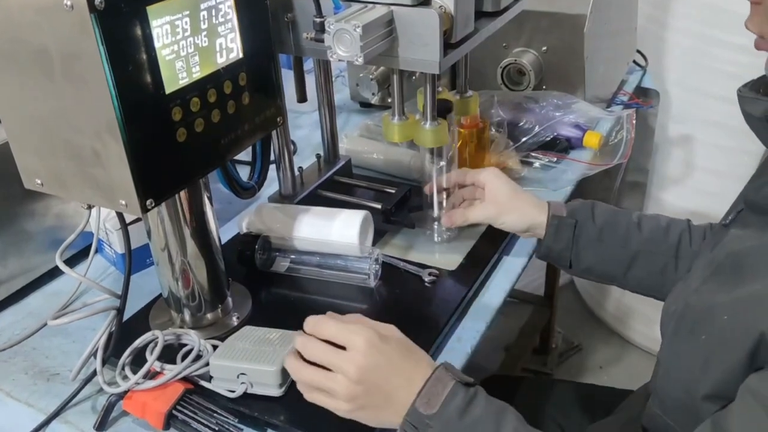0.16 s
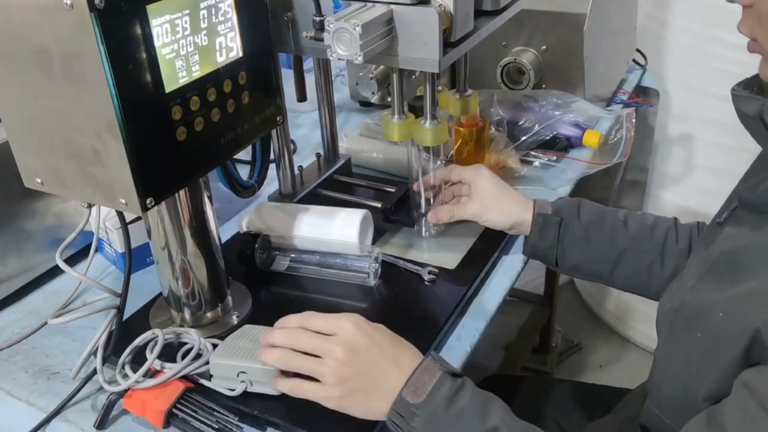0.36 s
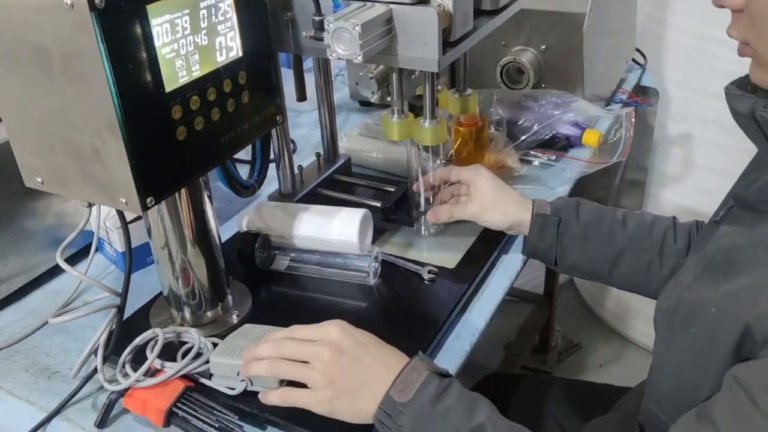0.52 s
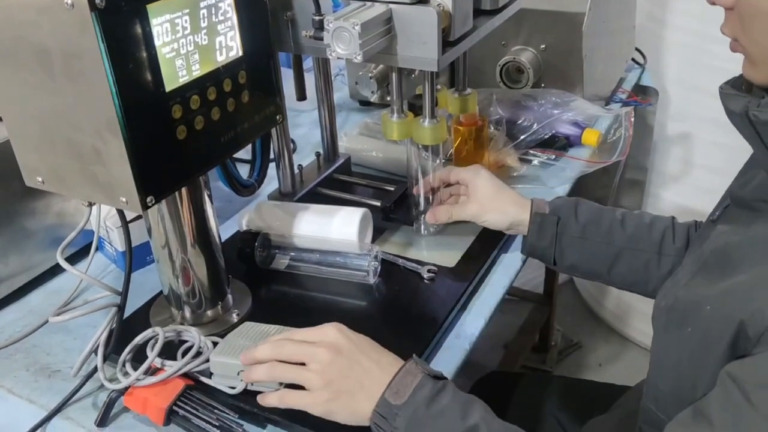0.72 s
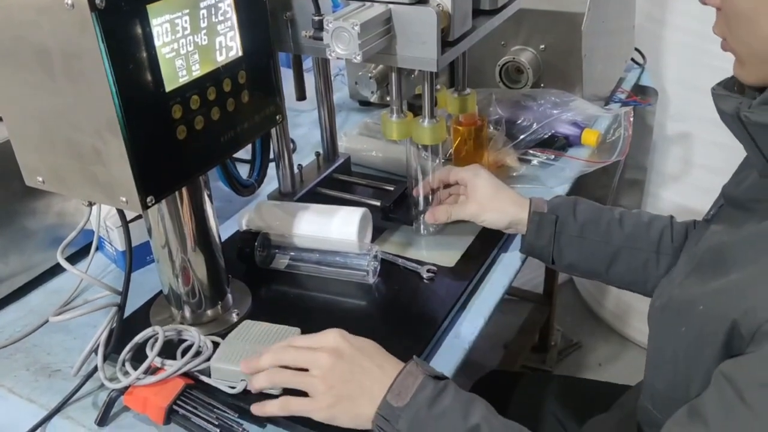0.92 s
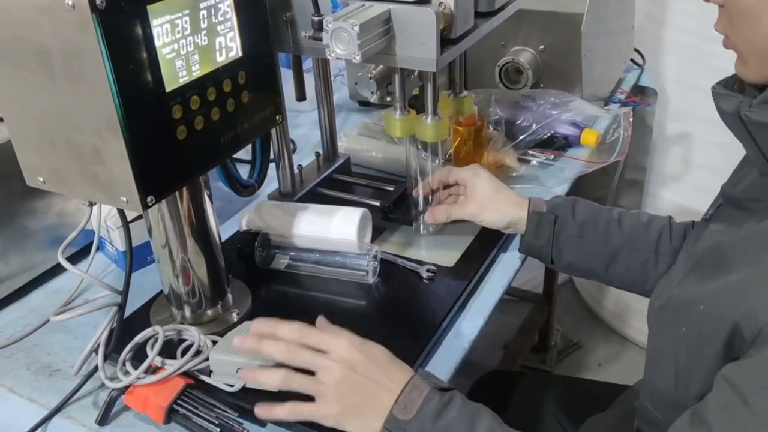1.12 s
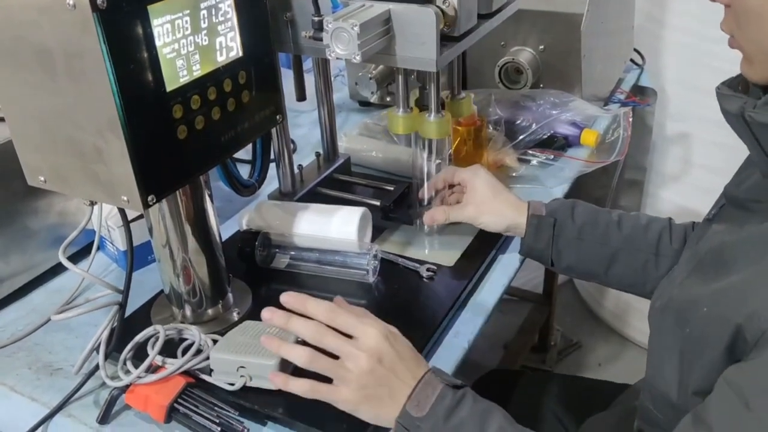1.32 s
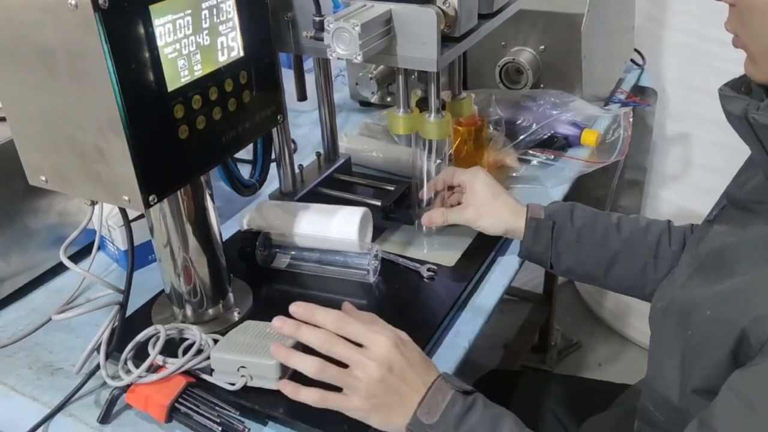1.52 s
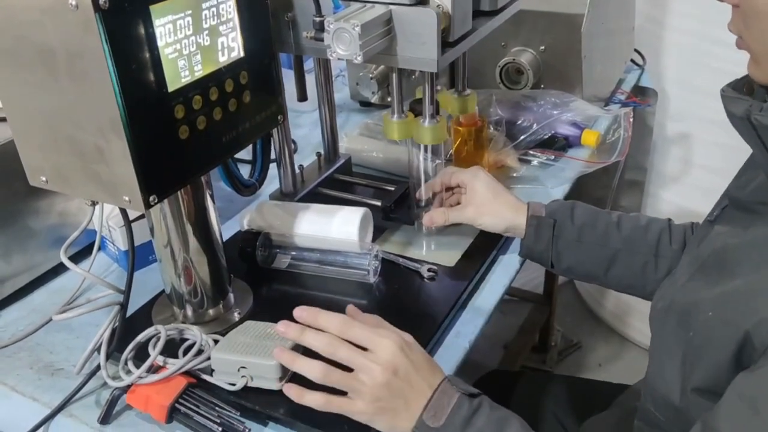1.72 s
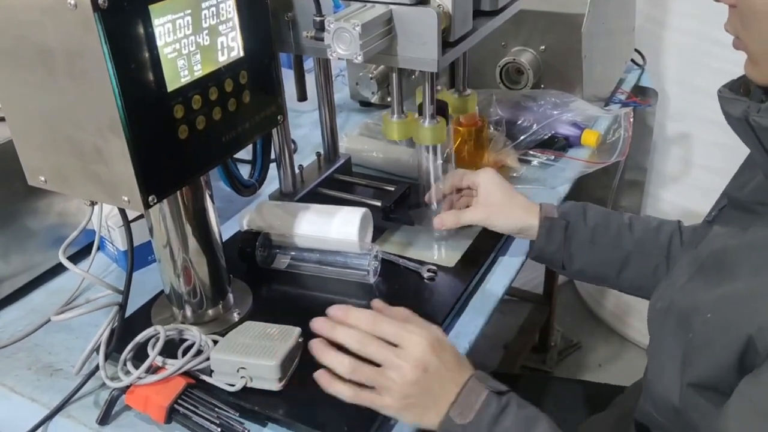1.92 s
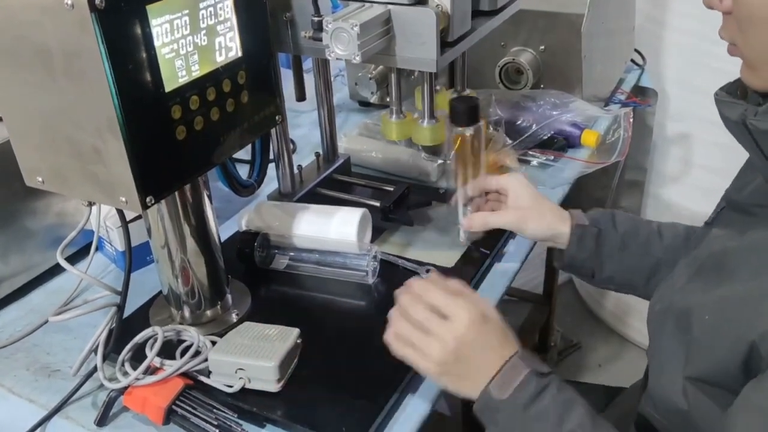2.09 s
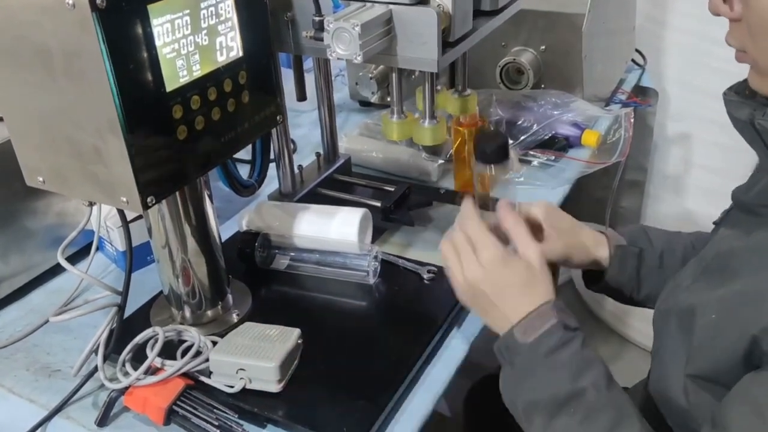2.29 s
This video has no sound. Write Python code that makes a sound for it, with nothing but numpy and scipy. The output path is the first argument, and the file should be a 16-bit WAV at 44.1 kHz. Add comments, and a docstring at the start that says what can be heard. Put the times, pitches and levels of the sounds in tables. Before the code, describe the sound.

An air-driven bench capper works one cycle over low rumble, throbbing motor hum and thin leaking hiss. Two dull distant booms roll at 0.1 and 0.26 seconds. A pedal switch snaps at 0.95; air spurts at 1.09, and the head clacks hard at 1.16. A brighter puff bursts at 1.52, with a softer hollow thunk at 1.61, tiny ticks from 1.8, and workshop echoes.

```python
"""Bench capper in a workshop

One cycle of an air-driven bench capper, over rumble, motor hum and the thin hiss of leaking air.
First two dull booms roll through the building: filtered noise bursts and ringing modes.
A pedal switch clicks, a valve puffs out air and the head clacks down on the cap; a second puff lifts it
to a softer stop. Air is shaped noise; the blows are short noise rattles with damped ringing notes.
Faint ticks of the bottle coming free end the cycle, and echoes surround the machine and pedal."""
import sys
import numpy as np
from scipy import signal
from scipy.fft import rfft, irfft
from scipy.io import wavfile
from scipy.ndimage import uniform_filter1d

SR = 44100
rng = np.random.default_rng(int(sys.argv[2]) if len(sys.argv) > 2 else 0)


def materialize(psi):
    """Save the field psi as 16-bit PCM at rate SR to the path in sys.argv[1].

    A 1-D psi becomes a single channel; in a 2-D psi each row is a channel.
    """
    bounded = np.clip(np.atleast_2d(psi).T, -1, 1)
    quanta = np.round(bounded * 32767).astype(np.int16)
    wavfile.write(sys.argv[1], SR, quanta)


N = 103635  # samples, 2.35 s


def amp(db):
    """Turns decibels into a gain."""
    return 10 ** (np.asarray(db) / 20)


def unit(x):
    """Scales a signal to rms 1."""
    return x / np.sqrt(np.mean(x ** 2) + 1e-20)


def read(points, hz):
    """Reads a table of points in straight lines along log frequency."""
    f, value = np.transpose(points)
    return np.interp(np.log(hz + 1), np.log(f + 1), value)


def clock():
    """Gives the time of every sample in seconds."""
    return np.arange(N) / SR


def noise(points):
    """Steady noise of rms 1 with the given spectrum."""
    gain = amp(read(points, np.fft.rfftfreq(N, 1 / SR)))
    return unit(irfft(rfft(rng.standard_normal(N)) * gain, N))


def drift(rate_hz):
    """Smooth random wandering of rms 1, with little movement faster than rate_hz."""
    hz = np.fft.rfftfreq(N, 1 / SR)
    keep_slow = np.exp(-(hz / rate_hz) ** 2) * (hz > 0)
    return unit(irfft(rfft(rng.standard_normal(N)) * keep_slow, N))


TILT_PIVOT_HZ = 1070  # the treble tilt starts here


def colour(x, points, tilt_db=0):
    """Causal filter of unit energy with the given spectrum; tilt_db per octave changes the treble."""
    size = 4096
    hz = np.fft.rfftfreq(size, 1 / SR)
    db = read(points, hz) + tilt_db * np.log2(np.maximum(hz / TILT_PIVOT_HZ, 1))
    log_gain = np.log(amp(db - db.max()) + 1e-5)
    # The Hilbert transform supplies the phase that puts the energy as early as possible.
    mirrored = np.r_[log_gain, log_gain[-2:0:-1]]
    taps = np.fft.ifft(np.exp(np.conj(signal.hilbert(mirrored)))).real
    return signal.fftconvolve(x, taps / np.linalg.norm(taps))[:N]


def envelope(start, rise, t60, hold=0):
    """Rises, holds, then dies away by 60 dB in t60 seconds."""
    t = clock() - start
    fall = np.exp(-np.log(1000) * np.maximum(t - rise - hold, 0) / t60)
    return np.clip(t / rise, 0, 1) * fall


def burst(start, rise, t60, hold=0):
    """A burst of white noise."""
    return rng.standard_normal(N) * envelope(start, rise, t60, hold)


def ring(start, modes):
    """Notes struck at one moment, each dying away at its own pace."""
    t = np.maximum(clock() - start, 0)
    return sum(amp(db) * np.exp(-np.log(1000) * t / t60) * np.sin(2 * np.pi * hz * t)
               for hz, db, t60 in modes)


# Colour of the workshop rumble. Each row: frequency in Hz, relative level in dB.
RUMBLE_COLOUR = [(30, -21), (50, 6), (75, -2.5), (120, 1.5), (220, -2.5), (340, -3.5), (450, -16.5),
                 (680, -12), (1000, -17), (1500, -20), (2200, -23), (4000, -67)]
RUMBLE_END_DB, RUMBLE_FADE_DB_PER_S = -41.5, 1


def rumble():
    """Low shaped noise that eases steadily to its final level."""
    t = clock()
    return amp(RUMBLE_END_DB + RUMBLE_FADE_DB_PER_S * (t[-1] - t)) * noise(RUMBLE_COLOUR)


# Colour of the leaking air. Each row: frequency in Hz, relative level in dB.
LEAK_COLOUR = [(880, -59), (1500, 0), (1670, -10.5), (2030, -8), (2410, 4.5), (2750, -6.5), (3030, 2),
               (3520, -11.5), (3910, -10.5), (4220, -20.5), (4470, -5), (4640, -4.5), (5200, -21.5),
               (7250, -11), (8050, 1.5), (9370, -17), (10900, -21.5), (12700, -22), (14500, -36)]
LEAK_DB, LEAK_FLUTTER_DB, FLUTTER_HZ = -46, 1.5, 40


def leak():
    """Thin hiss of leaking air: shaped noise with a fluttering level."""
    return amp(LEAK_DB + LEAK_FLUTTER_DB * drift(FLUTTER_HZ)) * noise(LEAK_COLOUR)


# Notes of the motor hum. Each row: frequency in Hz, rms level in dB.
HUM_NOTES = [(100, -49), (162, -49), (198, -50.5)]
HUM_WAVER, WAVER_HZ = 0.27, 3.1
DRONE_HZ, DRONE_DB = 45.7, -44
THROB_HZ, THROB_DIP_S, THROB_DEPTH = 3.63, 1.61, 0.65  # one of the regular dips falls at THROB_DIP_S


def motor():
    """A deep drone that throbs regularly, under hum notes that waver in level and pitch."""
    t = clock()
    throb = 1 - THROB_DEPTH * np.cos(2 * np.pi * THROB_HZ * (t - THROB_DIP_S))
    out = amp(DRONE_DB) * unit(throb * np.sin(2 * np.pi * DRONE_HZ * t))
    for hz, db in HUM_NOTES:
        level = 1 + HUM_WAVER * drift(WAVER_HZ)
        phase = HUM_WAVER * hz / DRONE_HZ * drift(WAVER_HZ)  # higher notes wander more
        out += amp(db) * unit(level * np.sin(2 * np.pi * hz * t + phase))
    return out


# Swells of a higher hum note. Each row: time of its height in seconds, width in seconds,
# peak level in dB.
HUM_SWELLS = [(.17, 0.055, -34.5), (1.94, 0.15, -43.5)]
SWELL_HZ = 335


def swells():
    """A higher note of the hum swells up twice and sinks away."""
    t = clock()
    level = sum(amp(db) * np.exp(-((t - s) / width) ** 2) for s, width, db in HUM_SWELLS)
    return level * np.sin(2 * np.pi * SWELL_HZ * t)


# Distant booms. Each row: start in seconds, level of the roll in dB before the bass cut,
# level of the building's ring in dB before the bass cut, bass cut in Hz.
BOOM_EVENTS = [(.1, -33.5, -34, 136), (.258, -25.5, -27.5, 44)]
# Colour of the roll. Each row: frequency in Hz, relative level in dB.
BOOM_COLOUR = [(29, -32), (50, -30), (102, 6), (135, -9.5), (256, -4.5), (400, -17), (430, -23),
               (529, -16.5), (582, -51), (900, -33), (1170, -89), (1980, -120)]
# Notes of the ringing building. Each row: frequency in Hz, relative level in dB, 60 dB decay in seconds.
BUILDING_MODES = [(95.7, -9, 2.4), (113.7, -9, 3.1), (166.7, 9, 0.39), (206.5, -4, 0.94), (264, -8, 2.8),
                  (296, -19, 0.39), (326.7, -8.5, 0.73), (385.5, -14.5, 1.2)]
BOOM_RISE_S, BOOM_T60, BOOM_TAIL_DB, BOOM_TAIL_T60 = 0.034, 0.12, 0.5, 1.97


def booms():
    """Far, dull blows that roll on and ring through the building; the first has little weight."""
    out = np.zeros(N)
    for s, db, ring_db, cut_hz in BOOM_EVENTS:
        thud = burst(s, BOOM_RISE_S, BOOM_T60)
        tail = amp(BOOM_TAIL_DB) * burst(s, BOOM_RISE_S, BOOM_TAIL_T60)
        roll = amp(db) * colour(thud + tail, BOOM_COLOUR)
        soft_start = np.clip((clock() - s) / BOOM_RISE_S, 0, 1)
        building = amp(ring_db) * soft_start * ring(s, BUILDING_MODES)
        bass_cut = signal.butter(4, cut_hz, "highpass", fs=SR, output="sos")
        out += signal.sosfilt(bass_cut, roll + building)
    return out


# Pedal switch contacts. Each row: start in seconds, level of the snap in dB,
# level of the housing's ring in dB.
CONTACTS = [(0.9321, -33.5, -25.5), (0.959, -16, -23), (0.9607, -19.5, -26.5), (0.9649, -28.5, -28)]
# Notes of the pedal housing. Each row: frequency in Hz, relative level in dB, 60 dB decay in seconds.
HOUSING_MODES = [(1006, 2, 0.06), (1270, -23, 0.12), (2320, -13.5, 0.037), (2610, -14, 0.095),
                 (3280, -11, 0.024)]
# Knock on the bench. Each row: frequency in Hz, level in dB, 60 dB decay in seconds.
KNOCK_MODES = [(716, -30.5, 0.11), (789, -21.5, 0.046)]
# The pedal's return spring. Each row: frequency in Hz, level in dB, 60 dB decay in seconds.
SPRING_MODES = [(930, -27, 0.25), (1020, -41, 0.13), (2650, -37, 0.18), (3700, -43, 1), (11350, -53, 0.75)]
# Bright colour of the snaps, also used for the ticks. Each row: frequency in Hz, relative level in dB.
SNAP_COLOUR = [(880, -63), (1500, -12), (2030, -10), (2630, -10.5), (3060, -9), (3360, -33), (3660, -24),
               (3990, -4), (4260, -20), (4640, -6), (5060, -21), (5450, -6), (6000, -21), (6720, -1.5),
               (7390, -9), (8360, 5), (9370, -11), (10200, -4), (13300, -17), (13800, -11), (14500, -35)]
SNAP_RISE_S, SNAP_T60 = 0.00027, 0.019
SPRING_RATTLE, RATTLE_HZ = 1, 60


def switch():
    """The pedal touches, snaps over, knocks the bench on the third contact and bounces; its spring rattles."""
    snaps = sum(amp(db) * burst(s, SNAP_RISE_S, SNAP_T60) for s, db, _ in CONTACTS)
    housing = sum(amp(db) * ring(s, HOUSING_MODES) for s, _, db in CONTACTS)
    bottom = CONTACTS[2][0]
    spring = sum(ring(bottom, [mode]) * unit(1 + SPRING_RATTLE * drift(RATTLE_HZ))
                 for mode in SPRING_MODES)
    return colour(snaps, SNAP_COLOUR) + housing + ring(bottom, KNOCK_MODES) + spring


# Ticks of the bottle as the head lets go. Each row: start in seconds, level in dB.
BOTTLE_TICKS = [(1.8001, -35), (1.8255, -46), (1.847, -46)]
TICK_T60 = 0.015


def ticks():
    """Small, bright ticks of the bottle coming free: very short noise bursts."""
    bursts = sum(amp(db) * burst(s, SNAP_RISE_S, TICK_T60) for s, db in BOTTLE_TICKS)
    return colour(bursts, SNAP_COLOUR)


# Valve and piston jolts. Each row: start in seconds, level in dB, 60 dB decay in seconds,
# treble tilt in dB per octave, level of the frame's ring in dB.
JOLT_EVENTS = [(1.089, -19.5, 0.038, -1.5, -36.5), (1.166, -30, 0.26, -13, -28.5),
               (1.505, -31.5, 0.023, -14, -29), (1.52, -20, 0.018, 2, -43)]
# Colour of a jolt before its tilt. Each row: frequency in Hz, relative level in dB.
JOLT_COLOUR = [(40, -32.5), (90, -9), (200, -1), (300, -5), (500, -12.5), (1000, -26.5), (3000, -95)]
# Notes of the frame and bench. Each row: frequency in Hz, relative level in dB, 60 dB decay in seconds.
FRAME_NOTES = [(130.9, -7.5, 0.54), (199, 2.5, 0.14)]
JOLT_ATTACK_S = 0.0016


def jolts():
    """Valve and piston shake the frame and bench: dull noise bursts over two low ringing notes."""
    out = np.zeros(N)
    for s, db, t60, tilt_db, ring_db in JOLT_EVENTS:
        out += amp(db) * colour(burst(s, JOLT_ATTACK_S, t60), JOLT_COLOUR, tilt_db)
        out += amp(ring_db) * ring(s, FRAME_NOTES)
    return out


# Piston hits on the padded stop. Each row: start in seconds, level in dB.
STOP_CHATTER = [(1.1704, -19), (1.6095, -23), (1.6195, -18), (1.6305, -23)]
# Notes of the end stop. Each row: frequency in Hz, relative level in dB, 60 dB decay in seconds.
STOP_NOTES = [(640, -14.5, 0.048), (808, -5, 0.033), (882, -0.5, 0.035), (969, -9, 0.056),
              (2071, -8.5, 0.069)]
STOP_PAD_S = 0.0021  # the padding softens the start of each hit


def end_stop():
    """Padded, hollow thunks as the piston meets its stop, chattering after the up stroke."""
    return sum(amp(db) * np.clip((clock() - s) / STOP_PAD_S, 0, 1) * ring(s, STOP_NOTES)
               for s, db in STOP_CHATTER)


SPUTTER_DB, SPUTTER_HZ = 0.6, 220


def puff(start, db, rise, hold, t60, port):
    """Air escapes unevenly through a port; the hiss falls with the pressure."""
    sputter = unit(amp(SPUTTER_DB * drift(SPUTTER_HZ)))
    return amp(db) * colour(burst(start, rise, t60, hold) * sputter, port)


PATCH_DB, PATCH_HZ, PATCH_S = 3, 450, 0.014  # strength before levelling, width and length of a patch


def flutter(x):
    """Patches of the spectrum rise and fall at random."""
    hz, at, z = signal.stft(x, SR, nperseg=256)
    patches = rng.standard_normal(z.shape)
    patches = uniform_filter1d(patches, max(round(PATCH_HZ / hz[1]), 1), axis=0)
    patches = uniform_filter1d(patches, max(round(PATCH_S / at[1]), 1), axis=1)
    gain = unit(amp(PATCH_DB * unit(patches)))
    return signal.istft(z * gain, SR, nperseg=256)[1][:N]


# Spurts as the valve's spool shifts. Each row: start in seconds, level in dB, rise in seconds,
# hold in seconds, 60 dB decay in seconds.
VALVE_SPURTS = [(1.0827, -19, 0.0034, .012, .045), (1.148, -29, 0.0015, .004, .012),
                (1.505, -34.5, 0.0043, 0.0032, 0.014)]
# Air vented by the down stroke, then the up stroke. Each row: start in seconds, level in dB,
# rise in seconds, hold in seconds, 60 dB decay in seconds.
STROKE_PUFFS = [(1.094, -20, 0.0047, 0.0096, 0.35), (1.521, -19, 0.005, 0.023, 0.34)]
# Colours of the valve and the two exhaust ports. Each row: frequency in Hz, relative level in dB.
VALVE_COLOUR = [(880, -32), (1500, -7), (1920, -22), (2580, -24), (3150, 3.5), (3560, -5.5), (4000, -1),
                (4340, -17.5), (5250, -2.5), (6590, -39), (7320, -6), (8280, 5), (9280, -19), (10300, 0.5),
                (11200, -27), (11850, 3), (13200, -11), (14500, -10)]
DOWN_PORT_COLOUR = [(410, -44), (700, -3), (998, -1), (1110, -7), (1770, -10), (1960, -29), (2400, -9),
                    (3170, -10), (3550, -28), (3830, -1), (3980, -34), (4130, -13.5), (6360, -4.5),
                    (7310, -10), (8300, 2.5), (10600, -5.5), (12100, 0), (13300, -12), (14500, -9)]
UP_PORT_COLOUR = [(400, -23), (700, -9.5), (1350, -12), (1750, -4.5), (2000, -8), (2850, 0.5), (3400, -3),
                  (4150, -2), (4380, -24), (4720, -14), (4950, -3), (5400, -10.5), (5800, -4), (6900, -10),
                  (7500, 1), (8200, 6), (9000, 0), (10100, -3), (10800, -3.5), (11900, 0), (13000, -5.5),
                  (14500, -7.5)]
# The down stroke's air chokes as the head nears the cap.
CHOKE_S, CHOKE_DB, CHOKE_FALL_S = 1.152, -12, 0.0018


def exhaust():
    """The valve spurts as it shifts, then each stroke vents, sputtering, through its own port."""
    spurts = sum(puff(*row, VALVE_COLOUR) for row in VALVE_SPURTS)
    down = puff(*STROKE_PUFFS[0], DOWN_PORT_COLOUR)
    up = puff(*STROKE_PUFFS[1], UP_PORT_COLOUR)
    choke = amp(CHOKE_DB * np.clip((clock() - CHOKE_S) / CHOKE_FALL_S, 0, 1))
    return spurts + flutter(down * choke + up)


def resonate(x, hz, width):
    """Three equal resonances in a row follow the curve hz, making one steep peak."""
    turn = np.exp(2j * np.pi * np.cumsum(hz) / SR)
    r = np.exp(-np.pi * width / SR)
    # Shift the moving pitch down to zero, smooth there, and shift back.
    smooth = signal.lfilter([(1 - r) ** 3], np.poly([r, r, r]), x / turn)
    return (turn * smooth).real


# Narrow bands of the up port. Each row: starting frequency in Hz, width of each of the three
# resonances in Hz, rms level in dB before the envelope.
SPIT_BANDS = [(1956, 41, -38.5), (2300, 140, -38), (2940, 370, -30.5), (3490, 730, -28.5),
              (5380, 500, -25.5)]
SPIT_HOLD_S, SPIT_T60 = 0.008, 0.12
SPIT_SAG_PER_S = 1.34  # rate at which the pitch sinks, as a share of itself


def spit():
    """The first rush of the up stroke sounds its port's resonances, which sink as the pressure empties."""
    start, _, rise, _, _ = STROKE_PUFFS[1]
    sag = np.exp(-SPIT_SAG_PER_S * np.clip(clock() - start, 0, SPIT_T60))
    bands = sum(amp(db) * unit(resonate(rng.standard_normal(N), hz * sag, width))
                for hz, width, db in SPIT_BANDS)
    return bands * envelope(start, rise, SPIT_T60, SPIT_HOLD_S)


# Blows of the head. Each row: start in seconds, level of the rattle in dB, rise in seconds,
# 60 dB decay in seconds, treble tilt in dB per octave, level of the ring in dB.
HEAD_BLOWS = [(1.089, -21, 0.0025, 0.028, -12.5, -45), (1.162, -16, 0.0019, 0.038, -1, -10.5),
              (1.172, -25.5, .0005, 0.27, 0.5, -27), (1.1836, -23.5, 0.00056, 0.02, 0, -20.5),
              (1.609, -29, 0.0026, 0.33, -2.5, -32)]
# Colour of the rattle before its tilt. Each row: frequency in Hz, relative level in dB.
HEAD_COLOUR = [(180, -29), (300, -5), (395, -6.5), (794, -1), (1250, -10.5), (1570, -5), (2390, -0.5),
               (2680, -4), (2960, 0), (3370, -8.5), (4000, -7), (4400, -11), (4730, -6.5), (5390, -11),
               (6650, -39), (7700, 1), (8220, -1.5), (9980, -5), (11000, -12), (11900, 1), (13000, -14),
               (14500, -43)]
# Notes of the ringing head. Each row: frequency in Hz, relative level in dB, 60 dB decay in seconds.
HEAD_NOTES = [(870, -16.5, .05), (1546, -12.5, 0.031), (1638, -9, 0.027), (1854, -10, 0.022),
              (2254, -10.5, .02), (3040, -14, 0.037)]


def head():
    """The head breaks loose, strikes the cap, settles and returns to its stop: a rattle and a ring each."""
    out = np.zeros(N)
    for s, db, rise, t60, tilt_db, ring_db in HEAD_BLOWS:
        out += amp(db) * colour(burst(s, rise, t60), HEAD_COLOUR, tilt_db)
        out += amp(ring_db) * ring(s, HEAD_NOTES)
    return out


# Echoes off the bench top and panels near the machine. Each row: delay in seconds, level in dB
# relative to the direct sound.
PANEL_ECHOES = [(.0017, -12.5), (.0031, -17), (.0054, -14.5), (.0097, -40), (0.0225, -20)]


def nearby(x):
    """First reflections comb the sound; the gain allows for their added energy."""
    echoes = sum(amp(db) * np.r_[np.zeros(round(s * SR)), x][:N] for s, db in PANEL_ECHOES)
    return (x + echoes) / np.sqrt(1 + sum(amp(db) ** 2 for _, db in PANEL_ECHOES))


# How long the workshop echoes. Each row: frequency in Hz, 60 dB decay in seconds.
ROOM_DECAY = [(100, 2.5), (500, 2), (2500, 1.27), (5000, 1.0), (8000, 0.8), (12000, .5)]
# Colour of the workshop's echo. Each row: frequency in Hz, relative level in dB.
ROOM_TONE = [(100, 6.5), (700, -2), (2500, 4), (5000, 5), (8000, -0.5), (12000, -1)]
ROOM_DELAY_S, ROOM_BUILD_S = 0.0035, 0.01


def room(x):
    """Sparse random reflections whose treble dies first."""
    taps = rng.choice([-1., 1.], N) * (rng.random(N) < 4000 / SR)  # about 4000 reflections per second
    taps *= np.clip((clock() - ROOM_DELAY_S) / ROOM_BUILD_S, 0, 1)
    hz, at, z = signal.stft(taps, SR, nperseg=256)
    decay = np.exp(-np.log(1000) * at / read(ROOM_DECAY, hz)[:, None])
    z = z * decay * amp(read(ROOM_TONE, hz))[:, None]
    tail = signal.istft(z, SR, nperseg=256)[1][:N]
    return signal.fftconvolve(x, tail / np.linalg.norm(tail))[:N]


MACHINE_WET_DB, SWITCH_WET_DB, SPIT_WET_DB = -7, -8, -14.5  # how strongly each feeds the echo


def scene():
    """Machine and switch in the room, over the background; the narrow jet of the spit stirs the room least."""
    background = rumble() + leak() + motor() + swells()
    pedal = switch()
    machine = nearby(exhaust()) + jolts() + head() + end_stop() + ticks()
    jet = spit()
    echo = room(amp(MACHINE_WET_DB) * machine + amp(SWITCH_WET_DB) * pedal + amp(SPIT_WET_DB) * jet)
    return (background + booms() + pedal + machine + jet + echo)[None]


MIC_LOW_HZ, EDGE_HZ = 36.5, 14200


def record(dry):
    """The microphone cuts the deepest bass, and a steep filter removes the highest treble."""
    bass_cut = signal.butter(4, MIC_LOW_HZ, "highpass", fs=SR, output="sos")
    treble_cut = signal.firwin(401, EDGE_HZ, window=("kaiser", 8), fs=SR)
    return signal.oaconvolve(signal.sosfilt(bass_cut, dry), treble_cut[None], "same")


dry = scene()
out = record(dry)
materialize(out)
```